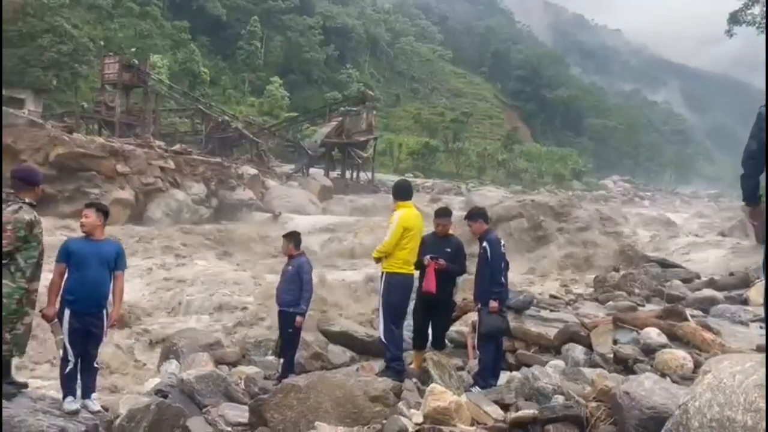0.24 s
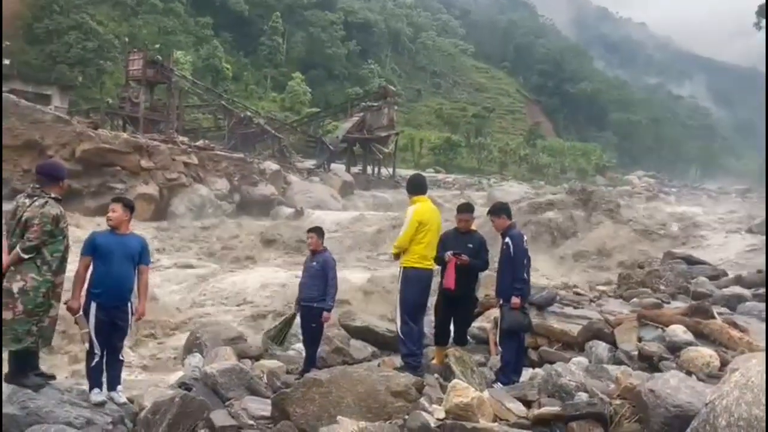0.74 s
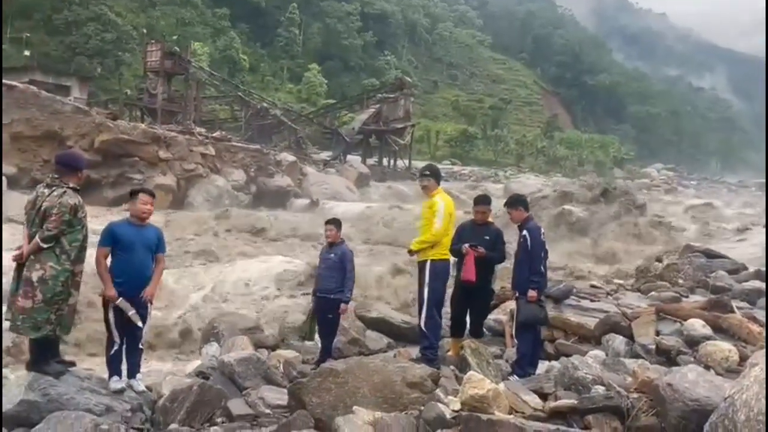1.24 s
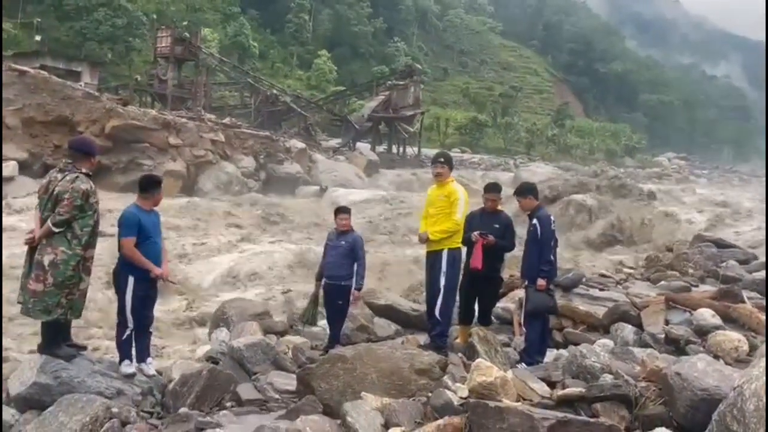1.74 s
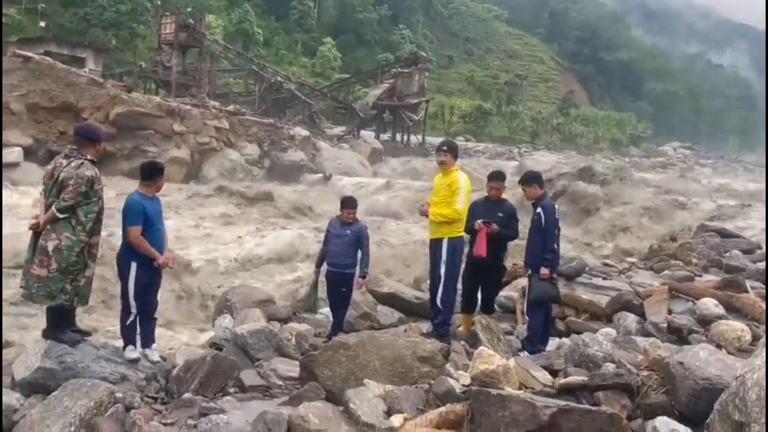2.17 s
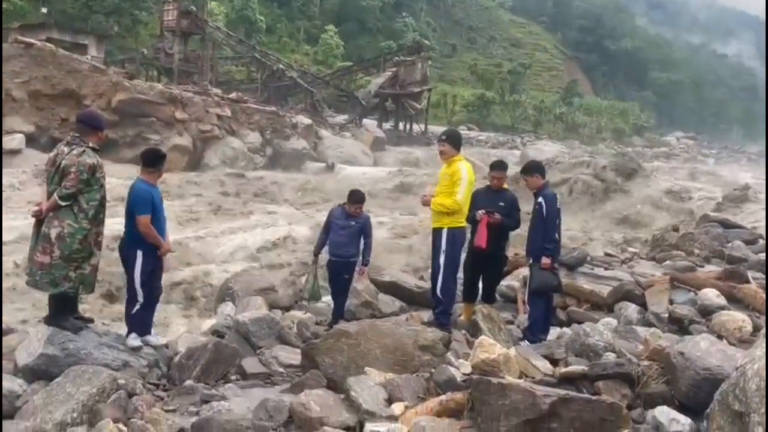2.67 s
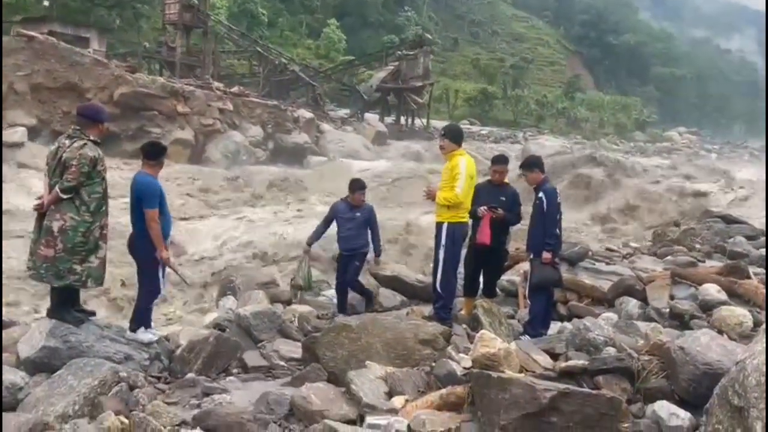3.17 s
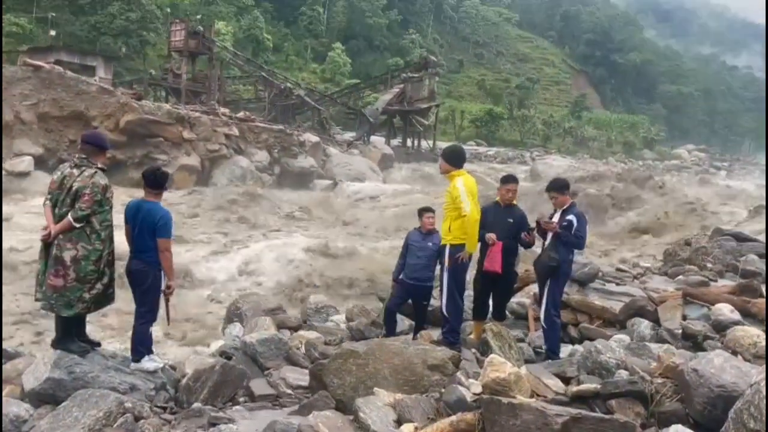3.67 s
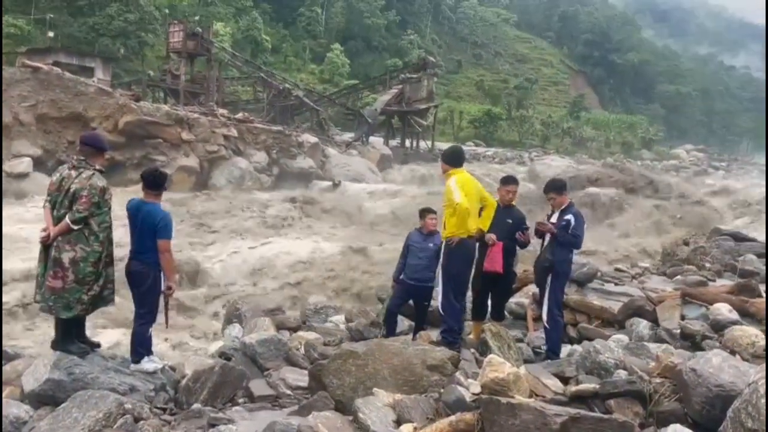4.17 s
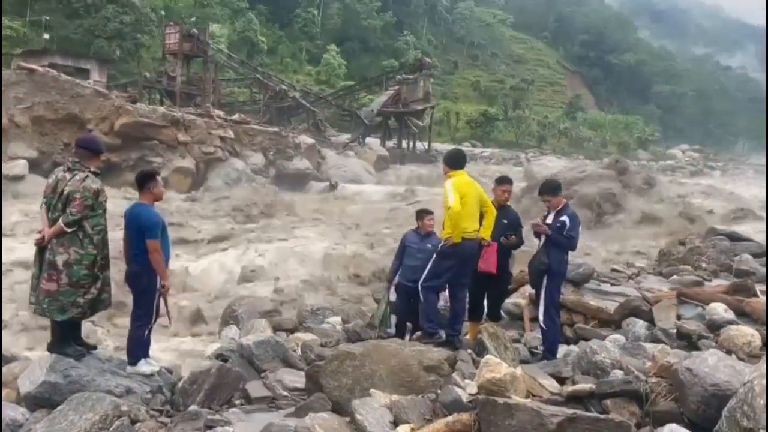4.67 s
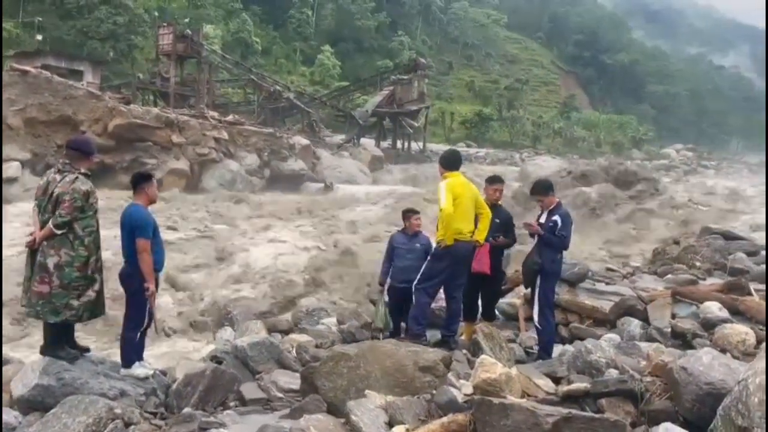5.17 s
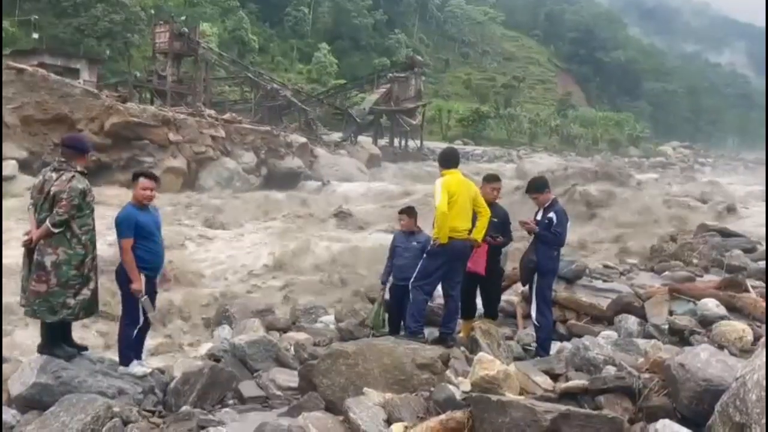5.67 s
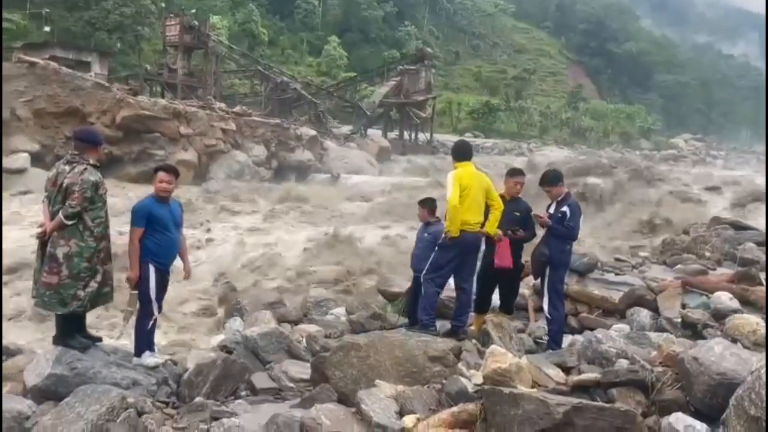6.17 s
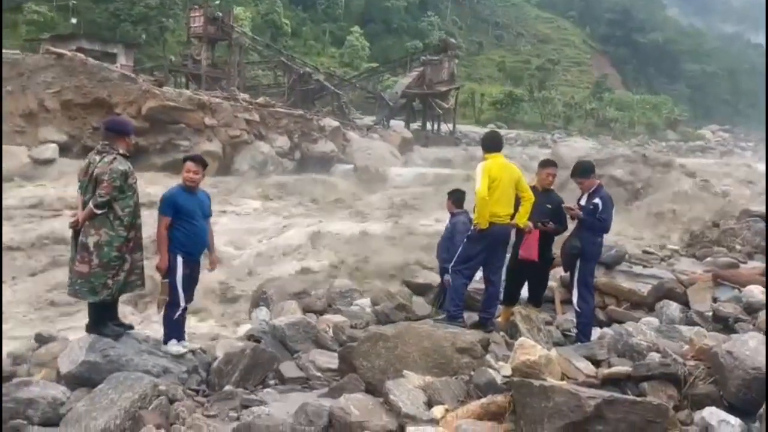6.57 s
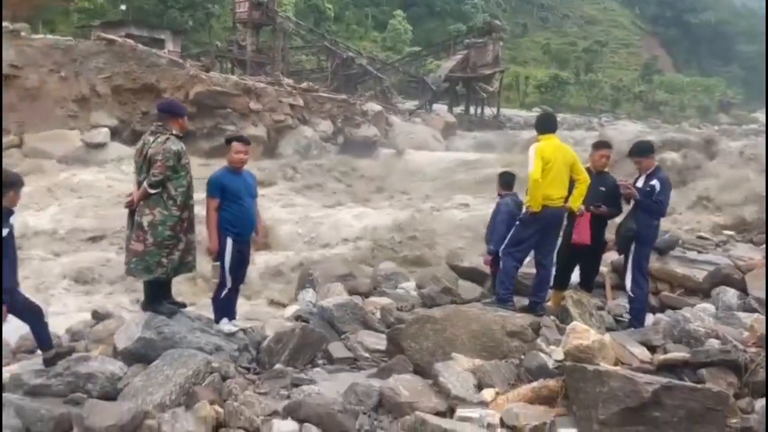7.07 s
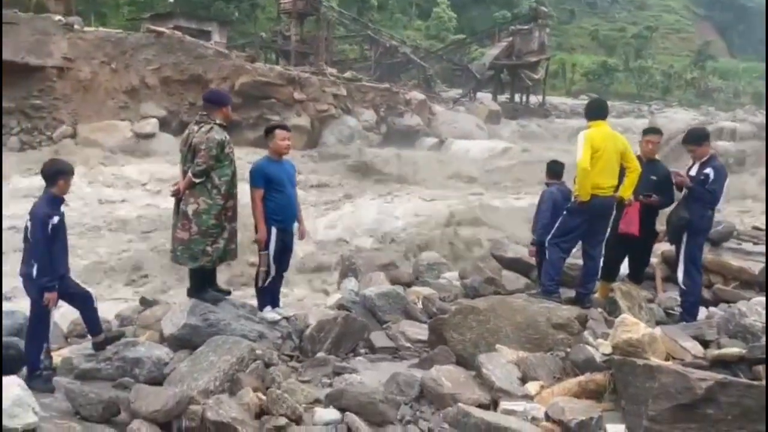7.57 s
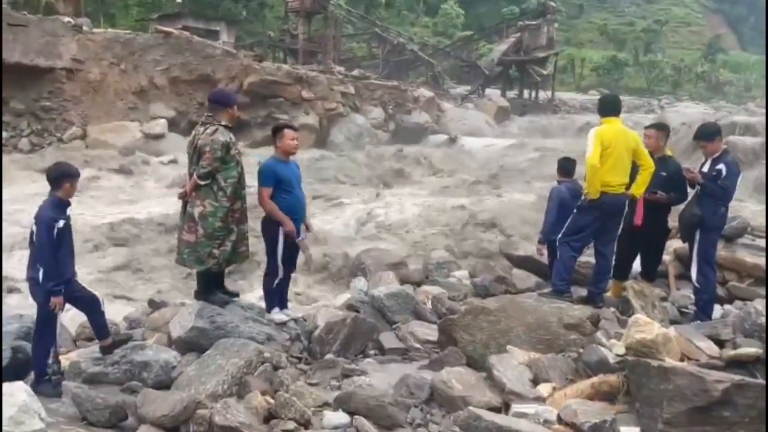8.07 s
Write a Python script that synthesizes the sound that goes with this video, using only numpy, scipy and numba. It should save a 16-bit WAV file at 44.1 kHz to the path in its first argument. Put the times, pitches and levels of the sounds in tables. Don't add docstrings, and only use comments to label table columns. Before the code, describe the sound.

A flooded river rushes over boulders a few metres away in an open valley. A deep, powerful rumble dominates, beneath a dense roar of churning bubbles and softer hissing spray. The flow is constant, with only slight surges: the rumble dips just before two seconds, then swells. A tiny dropout interrupts it around 3.4 seconds. Handheld phone sound, wide stereo, loud, with dull, slightly watery, patchy treble.

```python
import sys
import numpy as np
from scipy import signal
from scipy.fft import rfft, irfft
from scipy.io import wavfile
from scipy.ndimage import uniform_filter1d
from numba import njit

SR = 44100
rng = np.random.default_rng(int(sys.argv[2]) if len(sys.argv) > 2 else 0)


def gain_from_decibels(decibels):
    exponent = np.asarray(decibels, float) / 20
    return 10 ** exponent


def waveform_to_disk(signal):
    frames = np.transpose(np.atleast_2d(signal))
    scaled = np.clip(frames, -1, 1) * 32767
    samples = np.round(scaled).astype(np.int16)
    wavfile.write(sys.argv[1], SR, samples)


N = 366912
HZ = np.maximum(np.arange(N // 2 + 1) * SR / N, 1)


def across(table, column):
    rows = np.array(table)
    return np.interp(np.log(HZ), np.log(rows[:, 0]), rows[:, column])


def unit(x):
    return x / np.sqrt(np.mean(np.abs(x) ** 2))


def flicker(rate_hz):
    hold = int(SR / rate_hz)
    steps = np.repeat(rng.standard_normal(N // 500), hold)[:N]
    smooth = uniform_filter1d(uniform_filter1d(steps, hold), hold)
    return unit(smooth)


def distant_wash():
    return unit(rfft(rng.standard_normal(N)))


@njit
def ring_bubbles(start, pitch_hz, size, cycles, glide, length):
    out = np.zeros(length)
    for k in range(len(start)):
        decay = cycles * SR / pitch_hz[k]
        step = np.exp(2j * np.pi * pitch_hz[k] / SR - 1 / decay)
        rise = np.exp(2j * np.pi * pitch_hz[k] * glide / SR / decay)
        swing = size[k] + 0j
        for i in range(start[k], min(start[k] + int(5 * decay), length)):
            swing *= step
            step *= rise
            out[i] += swing.imag
    return out


def near_bubbles(bubbles_per_s=4000, cycles=3.15, glide=0.045, scatter_db=1.0):
    count = int(bubbles_per_s * N / SR)
    start = (rng.random(count) * N).astype(np.int64)
    pitch_hz = 40 + 9500 * rng.random(count) ** 1.5
    size = gain_from_decibels(-scatter_db * np.log(1 - rng.random(count)))
    bubbles = rfft(ring_bubbles(start, pitch_hz, size, cycles, glide, N))
    return bubbles / np.sqrt(uniform_filter1d(np.abs(bubbles) ** 2, size=300))


def froth(bubble_share=0.25):
    share = bubble_share * (HZ < 10000)
    return np.sqrt(share) * near_bubbles() + np.sqrt(1 - share) * distant_wash()


# pitch_hz, level_db (per Hz)
RIVER_COLOUR = [(22, -61), (38, -47.5), (62, -37), (110, -40), (200, -47.5), (320, -52), (700, -54),
                (1400, -61.5), (1800, -63.5), (2100, -63), (2700, -65), (5800, -71), (9200, -74),
                (11200, -83.5)]
# pitch_hz, side_minus_mid_db,
# in_step_likeness (-1 to 1), quarter_turn_likeness (-1 to 1)
PORT_PAIR = [(60, -26.5, .12, .1), (200, -14.8, .13, .36), (500, -4.9, .35, .5), (1000, -2.1, .38, .39),
             (1850, -2.5, -.2, -.24), (2250, -15.5, .06, .01), (3300, -4, .42, .4), (4900, -12.5, .25, 0),
             (6100, -4, .3, -.14), (6500, 3.6, .32, .07), (7000, 16, 0, 0), (8300, 12, -.03, .05),
             (9300, -.7, .01, .54), (10200, -15, 0, .01)]


def two_ports():
    front, other = froth(), froth()
    likeness = across(PORT_PAIR, 2) + 1j * across(PORT_PAIR, 3)
    unlike = np.sqrt(np.clip(1 - np.abs(likeness) ** 2, 0, 1))
    side_gain = gain_from_decibels(across(PORT_PAIR, 1))
    side = side_gain * (likeness * front + unlike * other)
    colour = gain_from_decibels(across(RIVER_COLOUR, 1)) / np.sqrt(1 + side_gain ** 2)
    return colour * np.array([front, side])


# time_s, rumble_db (about its mean)
RUMBLE_LEVEL = [(0.0, 0), (0.7, 0), (1.3, 0.5), (1.85, -2.5), (2.4, 1.7), (3.1, -0.9), (3.8, -0.4), (4.6, .3),
                (5.6, -0.5), (6.3, -0.3), (7.3, 0), (8.32, 1)]


def river():
    spectra = two_ports() * np.sqrt(N * SR / 2)
    above_rumble = 1 / (1 + (200 / HZ) ** 4)
    above_roar = 1 / (1 + (1500 / HZ) ** 4)
    rumble = irfft(spectra * (1 - above_rumble), N)
    roar = irfft(spectra * (above_rumble - above_roar), N)
    spray = irfft(spectra * above_roar, N)

    time_s, rumble_db = np.transpose(RUMBLE_LEVEL)
    rumble *= gain_from_decibels(np.interp(np.arange(N) / SR, time_s, rumble_db))

    rate_hz = 5.0
    rumble *= gain_from_decibels(0.3 * flicker(rate_hz))
    roar *= gain_from_decibels(0.4 * flicker(rate_hz))
    spray *= gain_from_decibels(0.3 * flicker(rate_hz))
    return rumble + roar + spray


def scene():
    mid, side = river()
    return np.array([mid + side, mid - side])


def microphone(dry):
    low_cut = signal.butter(2, 33, "high", fs=SR, output="sos")
    high_cut = signal.butter(10, 12200, fs=SR, output="sos")
    mic = signal.sosfilt(high_cut, signal.sosfilt(low_cut, dry))
    limit = 1.1
    return limit * np.tanh(mic / limit)


# pitch_hz, line_db (relative to the local sound)
MASKING_LINE = [(300, -26), (1500, -14), (2200, -10), (5000, -7), (7000, -6.5), (9000, -5), (10800, -5),
                (11500, 0), (12000, 8)]


def blank_masked(left_right, waver_db=1.04, patchy_db=1.9):
    lead = 253
    spare_s, spare_db = np.array([1.49, 3.455]), -9
    mid_side = np.array([left_right[0] + left_right[1], left_right[0] - left_right[1]]) / 2
    frame = dict(window=np.sqrt(signal.get_window("hann", 2048)), nperseg=2048, noverlap=1024, fs=SR)
    hz, time_s, tiles = signal.stft(np.pad(mid_side, ((0, 0), (lead, 0))), **frame)

    power = np.abs(tiles) ** 2
    local = uniform_filter1d(power.sum(0), size=60, axis=0)
    local = uniform_filter1d(local, size=5, axis=1)

    waver = unit(uniform_filter1d(rng.standard_normal(len(time_s)), size=7))
    patches = np.repeat(rng.standard_normal((65, len(time_s))), 16, axis=0)[:len(hz)]
    is_spare = np.abs(time_s[:, None] - lead / SR - spare_s).min(1) < 0.013
    line_db = np.interp(hz, *np.transpose(MASKING_LINE))[:, None]
    line_db = line_db + waver_db * waver + patchy_db * patches + spare_db * is_spare

    kept = uniform_filter1d(power, size=5, axis=1) > local * gain_from_decibels(2 * line_db)
    mid, side = signal.istft(tiles * kept, **frame)[1][:, lead:lead + N]
    return np.array([mid + side, mid - side])


# start_s, end_s, leftover_db, leftover_t60_s (time to fade by 60 dB)
LOST_PIECE = (3.394, 3.4437, -14, .03)


def drop_piece(sound):
    start_s, end_s, leftover_db, t60_s = LOST_PIECE
    t = np.arange(N) / SR
    thin = signal.sosfilt(signal.butter(1, 400, "high", fs=SR, output="sos"), sound)
    fade_db = -60 * (np.maximum(t - start_s, 0) / t60_s) ** 2
    leftover = thin * gain_from_decibels(leftover_db + fade_db)
    return np.where((t > start_s) & (t < end_s), leftover, sound)


def roll_off(x):
    return signal.sosfilt(signal.butter(12, 12170, fs=SR, output="sos"), x)


def record(dry):
    heard = microphone(dry)
    mix = drop_piece(blank_masked(heard))
    return roll_off(mix)


dry = scene()
out = record(dry)
waveform_to_disk(out)
```